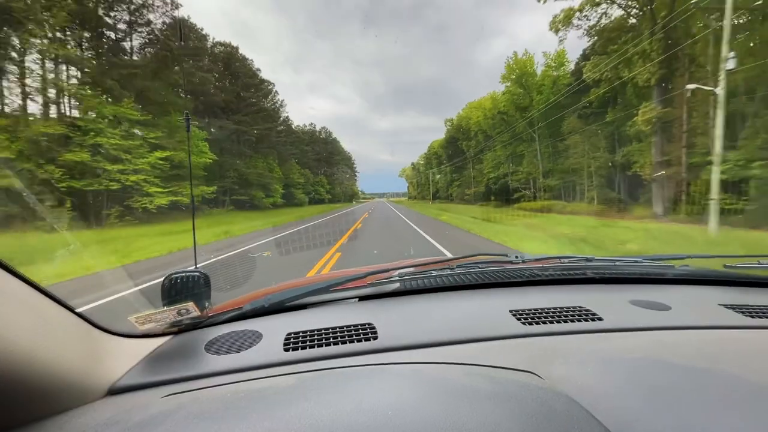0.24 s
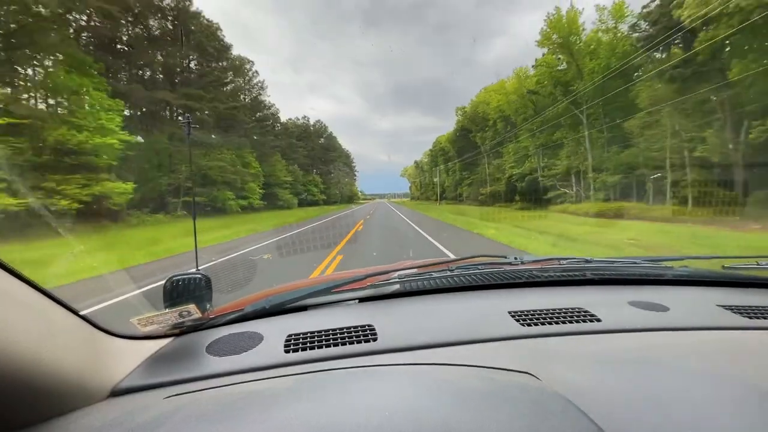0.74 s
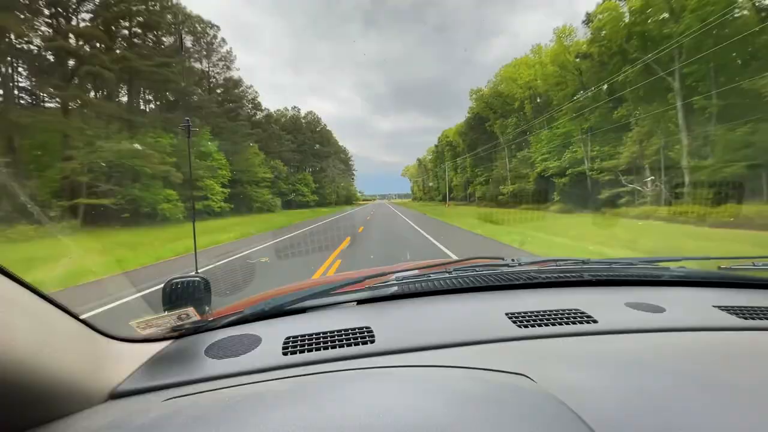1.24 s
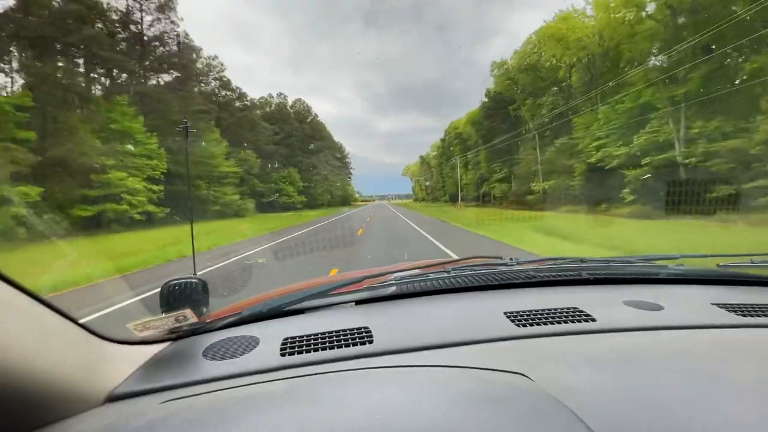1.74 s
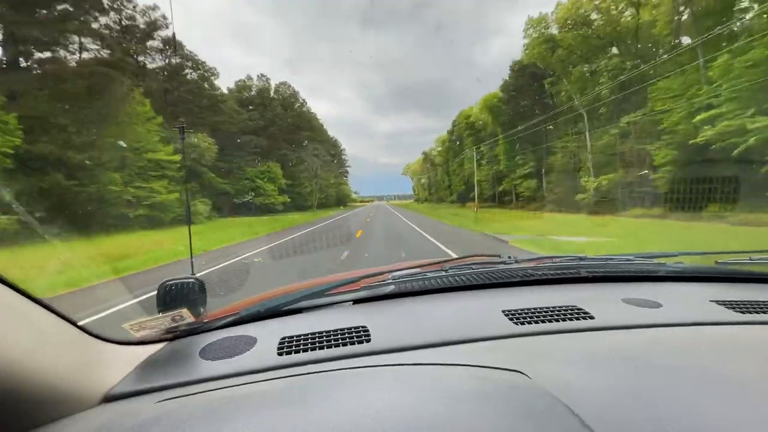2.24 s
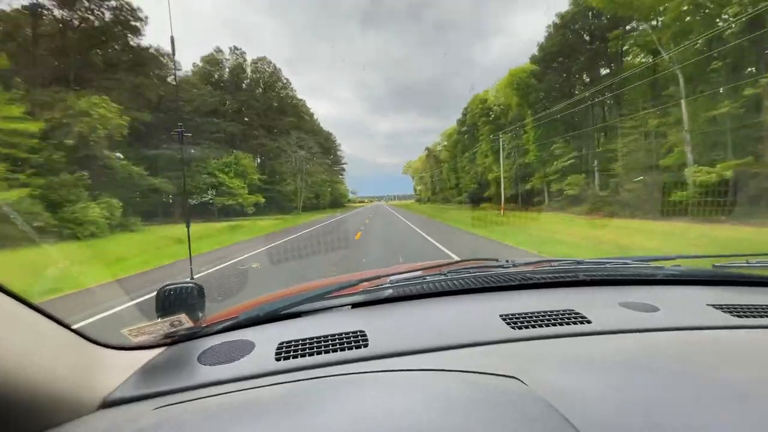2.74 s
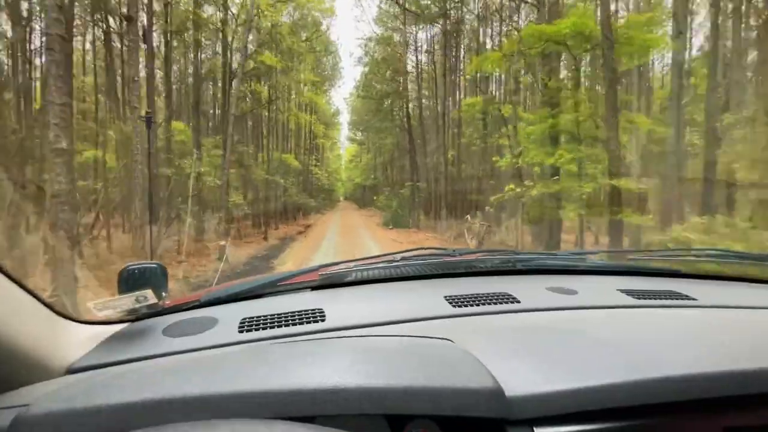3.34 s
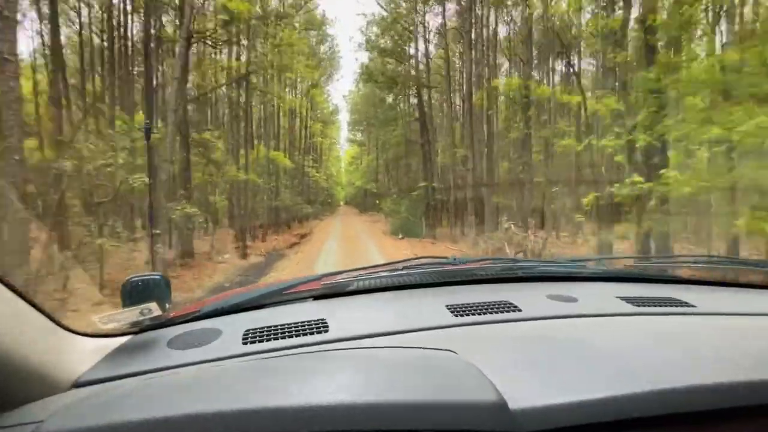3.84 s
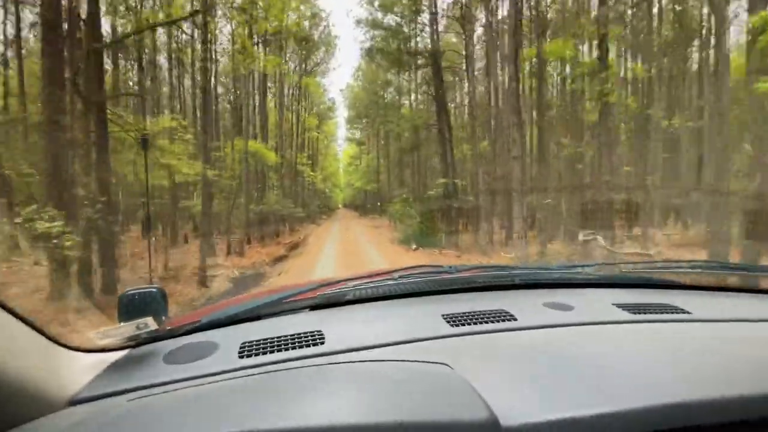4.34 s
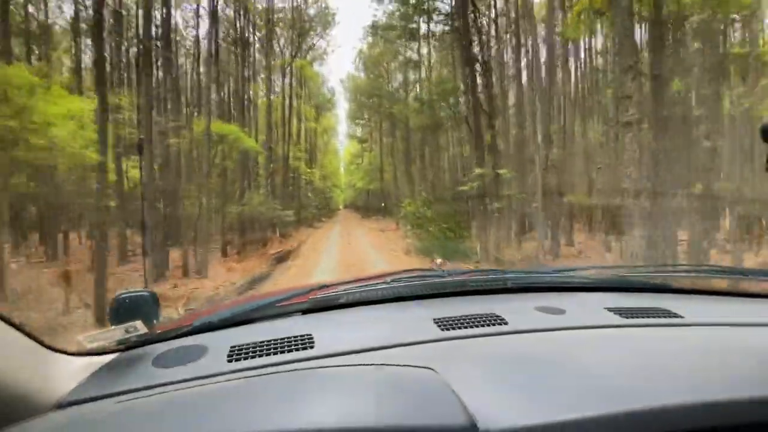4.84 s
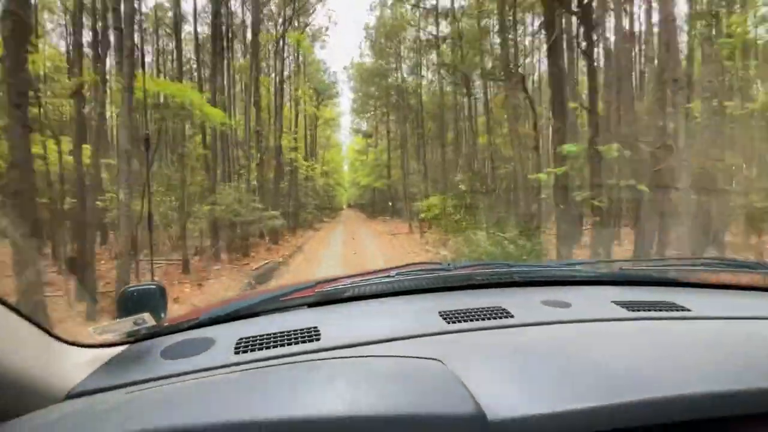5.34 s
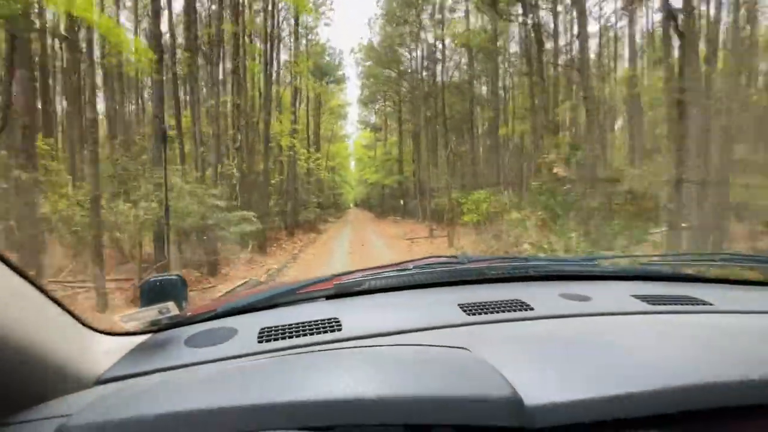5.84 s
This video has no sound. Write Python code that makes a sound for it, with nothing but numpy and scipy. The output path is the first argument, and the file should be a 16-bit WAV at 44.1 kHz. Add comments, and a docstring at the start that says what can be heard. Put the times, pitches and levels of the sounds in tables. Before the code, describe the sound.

Inside a closed truck cab, fast asphalt roar and wind hiss blend into slow, low rumbling over dirt, with knocks and ticking trim.

```python
"""Tyres roar and sing on asphalt, wind hisses and the engine surges, inside the shut cab of a pickup at speed.
This cross-fades into a slow drive along a dirt track: a low boom swells, grit crunches, trim ticks and rattles.
Shaped noise makes road and wind, sines make the engine and boom swells, bursts of grains and damped modes the rattles.
The two ports of a hand-held microphone hear most sounds a little apart; the engine sits in the centre."""
import sys
import numpy as np
from scipy import signal
from scipy.fft import rfft, irfft
from scipy.io import wavfile
from scipy.ndimage import uniform_filter1d

SR = 44100
rng = np.random.default_rng(int(sys.argv[2]) if len(sys.argv) > 2 else 0)


def store_pcm(level_fs):
    """Save levels as 16-bit WAV."""
    pcm = np.round(np.clip(level_fs, -1, 1) * 32767).astype(np.int16)
    wavfile.write(sys.argv[1], SR, np.atleast_2d(pcm).T)


N = 268128
TIME = np.arange(N) / SR
FREQ = np.maximum(np.arange(N // 2 + 1) * SR / N, 1)
TOP_HZ = 13500  # upper edge of the sound


def undb(db):
    """Decibels to gain."""
    return 10 ** (np.asarray(db) / 20)


def unit(x):
    """Scale to rms 1."""
    return x / np.sqrt(np.mean(x ** 2))


def curves(table):
    """The columns of a table as curves in time."""
    s, *columns = np.transpose(table)
    return [np.interp(TIME, s, column) for column in columns]


def over_freq(table):
    """The columns of a table on a log-frequency axis."""
    hz, *columns = np.transpose(table)
    return [np.interp(np.log(FREQ), np.log(hz), column) for column in columns]


def tone(table):
    """Gain of a spectrum that falls away above its last point."""
    return undb(over_freq(table)[0]) / np.maximum(FREQ / table[-1][0], 1) ** 3


def shape(x, gain):
    """Filter by a frequency response."""
    return irfft(rfft(x) * gain, N)


def band_rms(x, lo_hz, hi_hz):
    """Rms of the centre image between two frequencies."""
    return np.std(shape(x.mean(axis=0), (FREQ > lo_hz) & (FREQ < hi_hz)))


def resonance(hz, width_hz):
    """Response of one damped mode."""
    return 1 / (1 + 1j * (FREQ ** 2 - hz ** 2) / (FREQ * width_hz))


def walk(rate_hz):
    """Smooth random drift of rms 1, with little movement faster than rate_hz."""
    return unit(shape(rng.standard_normal(N), 1 / (1 + (FREQ / rate_hz) ** 4)))


def noise():
    """Two unrelated noises."""
    return rng.standard_normal((2, N))


def ports(pair, pan_db, coherence, lead_rad):
    """Mix two unrelated signals into left and right with a given likeness and phase lead."""
    likeness = np.clip(coherence, 0, .995)
    mid = rfft(pair[0]) * np.sqrt(1 + likeness)
    side = rfft(pair[1]) * np.sqrt(1 - likeness)
    turn = undb(pan_db / 2) * np.exp(.5j * lead_rad)
    return irfft(np.array([(mid + side) * turn, (mid - side) / turn]), N)


def even(x, span_s):
    """Hold a noise's slow loudness steady by dividing out its smoothed level."""
    size = max(int(span_s * SR), 2)
    power = uniform_filter1d(uniform_filter1d(np.mean(x ** 2, axis=0), size), size)
    return x * np.sqrt(power.mean() / power)


def grains(rate_hz, spread_db):
    """Two streams of tiny impacts at random times, their sizes spread exponentially in dB."""
    size_db = spread_db * np.minimum(rng.exponential(size=(2, N)), 5)
    hits = rng.random((2, N)) < rate_hz / SR
    return unit(hits * noise() * undb(size_db))


def singing(modes):
    """Narrow resonances kept ringing by noise, each held at a steady loudness."""
    total = 0
    for hz, width_hz, db, pan_db, lead_rad in modes:
        # the mode filters twice, so the peak is narrower than width_hz
        hum = shape(ports(noise(), pan_db, 0.75, lead_rad), resonance(hz, width_hz) ** 2)
        total = total + undb(db) * even(unit(hum), 0.35)
    return total


# Echoes off windscreen, roof and doors: delay_s, gain (relative to the direct hiss)
PANEL_ECHOES = [(.00135, 0.068), (.0023, -.17), (.0041, .16), (.0067, .15), (0.0118, -.14)]


def reflections():
    """Fine comb that the nearby panels put on the hiss, scaled to rms gain 1."""
    comb = 1 + sum(gain * np.exp(-2j * np.pi * FREQ * delay_s) for delay_s, gain in PANEL_ECHOES)
    return comb / np.sqrt(np.mean(np.abs(comb) ** 2))


# Colour of the wind: pitch_hz, level_db (relative, per Hz)
WIND_COLOUR = [(1500, -25), (3000, 4), (3750, -0.5), (4450, 1.5), (5250, -.5), (6400, 1), (7100, 1),
               (8200, 0), (9250, -.5), (10000, -12), (11000, -12), (11600, -21), (13400, -24)]
# Cab sound field at speed: pitch_hz, left_minus_right_db, coherence (0-1), left_lead_rad
ASPHALT_FIELD = [(50, 1.5, 0.97, .1), (171, -2, 0.94, 0.51), (300, 3.5, 0.35, 0.41), (470, -1, 0.73, 1.3),
                 (720, 7, 0.75, 1.7), (940, 1, 0.23, 1.8), (1100, 3.5, 0.46, 1.2), (1870, -5, 0.73, 2.86),
                 (2710, -3.5, 0, 3.57), (3520, -3.5, 0.17, 7.4), (4360, -1, 0.73, 7.05),
                 (5230, -1.5, 0.1, 7.2), (6200, 6, 0.5, 7.3), (8400, 0, 0.61, 9.65),
                 (10200, -2.5, 0.6, 6.5)]
GUST_DB = 1  # rms flutter of the wind


def wind(level_db):
    """Hiss of air on the pillars: coloured noise with a quick flutter, combed by the cab panels."""
    hiss = shape(ports(noise(), *over_freq(ASPHALT_FIELD)), tone(WIND_COLOUR) * reflections())
    hiss = hiss / band_rms(hiss, 3000, 10000)
    return hiss * undb(level_db + GUST_DB * walk(30))


def engine(course, orders, wobble, flutter_db):
    """Firing orders through the bulkhead: sines on one wavering pitch, each fluttering in level."""
    firing_hz, level_db = curves(course)
    phase = 2 * np.pi * np.cumsum(firing_hz * (1 + wobble * walk(6.5))) / SR
    total = 0
    for multiple, order_db in orders:
        level = undb(level_db + order_db + flutter_db * walk(12))
        total = total + level * np.sin(multiple * phase + 2 * np.pi * rng.random())
    return total


# Engine at speed: time_s, firing_hz (before wobble), level_db (before order and flutter)
CRUISE_COURSE = [(0, 114.6, -25), (.18, 116.6, -28), (.27, 116.6, -15), (.36, 116.5, -29),
                 (.54, 117.1, -17.5), (.71, 115.9, -24), (.78, 115.9, -20.5), (1.05, 117, -17),
                 (1.12, 116.5, -31), (1.21, 116.8, -14.5), (1.4, 117.2, -26.5), (1.45, 117.5, -16.5),
                 (1.84, 117.4, -23), (1.98, 117.9, -18), (2.05, 117.5, -28), (2.3, 117.9, -17),
                 (2.55, 117.9, -23.5), (3.3, 120, -14)]
# Engine partials at speed: multiple (of the firing rate), level_db (added to the course)
CRUISE_PARTIALS = [(.5, -10), (1, 3), (1.5, -23.5), (2.002, -32), (3.8, -25)]


def cruise_engine():
    """Surging drone of an engine at speed, its firing rate barely wobbling."""
    return engine(CRUISE_COURSE, CRUISE_PARTIALS, wobble=0.0026, flutter_db=0.5)


# Engine on the track: time_s, firing_hz (before wobble), level_db (before order and flutter)
CRAWL_COURSE = [(2.6, 97.26, -29), (3.64, 95.7, -32), (3.8, 92.64, -47), (3.92, 92.74, -33.5),
                (4.42, 97.9, -30.5), (4.86, 101.9, -30.5), (5.02, 98.8, -44), (5.6, 88.3, -41),
                (6.08, 88, -41)]
# Engine partials on the track: multiple (of the firing rate), level_db (added to the course)
CRAWL_PARTIALS = [(.5, -5), (1, 4), (1.5, -11), (2, -14)]


def crawl_engine():
    """Low, uneven drone of an engine at a crawl, with more random wobble and flutter."""
    return engine(CRAWL_COURSE, CRAWL_PARTIALS, wobble=0.0097, flutter_db=3.0)


# Whine modes: pitch_hz, width_hz (of one pass), level_db (before the load), left_minus_right_db, left_lead_rad
WHINE_MODES = [(405.3, 13.7, -5.5, -4, 0.008), (452, 7.8, -9, 3.5, 0.0034)]
# Whine as the throttle moves: time_s, level_db
WHINE_LEVEL = [(3, -56), (3.7, -42.5), (4.3, -47.5), (4.95, -38.5), (5.3, -49), (6.08, -59)]


def drivetrain_whine():
    """Faint drivetrain whine: two ringing modes that rise and fall with the load."""
    return singing(WHINE_MODES) * undb(curves(WHINE_LEVEL)[0])


def jolt(colour, contact_rate_hz, rise_s, start_s, level_db, pan_db, decay_s, tilt_db):
    """A burst of tiny contacts that sounds through a loose part."""
    age = TIME - start_s
    burst = np.clip(age / rise_s, 0, 1) * np.exp(-np.maximum(age - rise_s, 0) / decay_s)
    hits = grains(contact_rate_hz, spread_db=-0.2) * burst
    contacts = ports(hits, 0, 0.63, 2 * np.pi * FREQ * 0.000286)  # left leads by 0.286 ms
    octaves = np.log2(np.clip(FREQ, 800, TOP_HZ) / 800)
    sound = shape(contacts, colour * undb(tilt_db * octaves))
    side_db = np.array([[pan_db], [-pan_db]]) / 2
    return unit(sound) * np.sqrt(np.mean(burst ** 2)) * undb(level_db + side_db)


def ring(modes, start_s, level_db, pan_db):
    """Modes struck at one moment ring out, each reaching the two ports a little apart."""
    out, sides = np.zeros((2, N)), np.array([[1], [-1]])
    near = (TIME > start_s) & (TIME < start_s + .15)
    age = TIME[near] - start_s
    lags_rad = rng.uniform(-0.84, 1, len(modes))
    for (hz, width_hz, mode_db), lag in zip(modes, lags_rad):
        decay = np.exp(-np.pi * width_hz * age)
        out[:, near] += undb(mode_db) * decay * np.sin(2 * np.pi * hz * age + lag * sides)
    return out * undb(level_db + sides * pan_db / 2)


# Ring of the trim panel: pitch_hz, width_hz, level_db (before the focus of the blow)
PANEL_MODES = [(1860, 70, 1), (2600, 80, -2), (2930, 100, -6), (3590, 54, -2.5), (4300, 65, -12),
               (5430, 67, -1.5), (7020, 70, -2.5), (9250, 110, -2)]
TRIM_FOCUS_DB = 11  # modes ring this much less for each octave from the favoured pitch


def panel(favoured_hz):
    """The modes of the trim, weighted by the place of the blow."""
    return [(hz, width_hz, db - TRIM_FOCUS_DB * abs(np.log2(hz / favoured_hz)))
            for hz, width_hz, db in PANEL_MODES]


# Plastic snaps: start_s, level_db, left_minus_right_db, decay_s, tilt_db (per octave), ring_db, favoured_hz
TRIM_SNAPS = [(1.952, -46, -1, .0046, -8, -47, 1800), (3.566, -51, 8, 0.0048, -2, -56, 5340),
              (4.088, -33, -1, .0026, -2.3, -40.5, 3600), (4.8075, -25, -2, 0.0016, -1.9, -36.5, 2700),
              (5.552, -33.5, -3, .0036, -1.6, -40.5, 3600)]
# Bare snap of the plastic: pitch_hz, level_db (relative, per Hz)
PLASTIC_COLOUR = [(200, -10), (900, 4), (1500, -4.5), (1850, -0.5), (2200, -8), (2700, -9), (3500, -10),
                  (4500, -13.5), (5600, -11.5), (6500, -13.5), (7700, -19.5), (9200, -13), (10500, -20.5),
                  (13400, -22)]
TRIM_RISE_S = 0.002


def trim_snaps():
    """Loose plastic snaps as a short burst of contacts, then its panel rings."""
    plastic, total = tone(PLASTIC_COLOUR), 0
    for start_s, db, pan_db, decay_s, tilt_db, ring_db, favoured_hz in TRIM_SNAPS:
        snap = jolt(plastic, 24000, TRIM_RISE_S, start_s, db, pan_db, decay_s, tilt_db)
        total = total + snap + ring(panel(favoured_hz), start_s + TRIM_RISE_S, ring_db, pan_db)
    return total


# Bumps and stones: start_s, level_db, left_minus_right_db, decay_s, tilt_db (per octave), rise_s
FLOOR_KNOCKS = [(.781, -19, 1, 0.0055, 6, 0.00197), (3.353, -37, 1, .0042, 5.5, .001),
                (3.522, -39, 0, .0046, -11, .0013), (3.672, -38, 3, .013, 1, .005),
                (4.344, -37, 3, .034, 1.5, .014), (4.535, -42, 1, .02, 1, .01),
                (4.64, -38, 5, 0.0072, -6, .003), (4.708, -38.5, 0, .012, -5, .003),
                (4.795, -36, -2, .0045, -2, 0.0015), (4.895, -43, -3, .016, -2, .004),
                (5.452, -42, 1, 0.025, 6, .008), (5.64, -33.5, 6, .004, 2, 0.0011),
                (5.652, -34.5, -3, .005, 1, 0.00095)]
# Colour of the knocks: pitch_hz, level_db (relative, per Hz)
KNOCK_COLOUR = [(100, -20), (400, 3.5), (750, 3.5), (1100, -2.5), (1600, -13), (2500, -29.5)]
# Ring of the floor pan: pitch_hz, width_hz, level_db (against the knock, before hardness)
FLOOR_MODES = [(700, 70, 0.5), (1080, 110, -4)]
HARD_CONTACT_S = .002  # slower contacts hardly ring the floor pan


def floor_knocks():
    """Bumps and stones knock through the suspension; quick contacts ring the floor pan."""
    floor_pan, total = tone(KNOCK_COLOUR), 0
    for start_s, db, pan_db, decay_s, tilt_db, rise_s in FLOOR_KNOCKS:
        hardness = 1 / (1 + (rise_s / HARD_CONTACT_S) ** 2)
        knock = jolt(floor_pan, 6000, rise_s, start_s, db, pan_db, decay_s, tilt_db)
        total = total + knock + hardness * ring(FLOOR_MODES, start_s + rise_s, db, pan_db)
    return total


# Small metal parts: start_s, level_db, left_minus_right_db, decay_s, tilt_db (per octave),
# ring_db (against the bare metal), ring_hz
METAL_CHATTER = [(3.356, -64, 1, .018, 5, 14, 11500), (4.326, -67, 0, .004, 7, 13, 11600),
                 (4.816, -48, -5, .017, -9, -20, 7700), (5.513, -63.5, 0, .04, 3, 3, 9500),
                 (5.639, -53, 2, .009, 1, -6, 9800), (5.649, -50.5, 3, 0.023, -1, 2, 7780)]
# Colour of the metal: pitch_hz, level_db (relative, per Hz)
METAL_COLOUR = [(1500, -17), (3800, -5), (4700, -1.5), (5300, -4), (6100, 0), (6800, -8), (7600, 1.5),
                (8400, -8), (9700, -2), (10600, -14), (13000, -18)]
CHATTER_RISE_S, CHATTER_RING_WIDTH_HZ = .005, 280


def metal_chatter():
    """Small metal parts chatter: bursts of contacts through one bright resonance each."""
    metal, total = tone(METAL_COLOUR), 0
    for *blow, ring_db, ring_hz in METAL_CHATTER:
        ringing = 1 + undb(ring_db) * resonance(ring_hz, CHATTER_RING_WIDTH_HZ)
        total = total + jolt(metal * ringing, 4000, CHATTER_RISE_S, *blow)
    return total


CAB_T60_S, CAB_DB = 0.098, -9.5  # decay time; tail level against the direct sound


def rattles():
    """Trim, knocks and chatter, with the short noise tail of the upholstered cab."""
    direct = trim_snaps() + floor_knocks() + metal_chatter()
    tail = noise() * np.exp(-np.log(1000) * TIME / CAB_T60_S)
    return direct + undb(CAB_DB) * shape(direct, rfft(unit(tail)) / np.sqrt(N))


def body_and_roar(colour, field, split_hz):
    """Road shake, parted into the boom of the cab panels and the roar of the tyres."""
    shake = shape(ports(noise(), *over_freq(field)), tone(colour))
    boom = shape(shake, 1 / (1 + (FREQ / split_hz) ** 8))
    return boom, shake - boom


# Asphalt: time_s, rumble_db, wind_db, roar_db
ASPHALT_LEVELS = [(0, -19, -48, -25), (.85, -20.5, -48, -26), (1.5, -22, -49.5, -25.5),
                  (2.05, -24, -50, -26.5), (2.3, -25, -47.5, -25.5), (3, -19.5, -50, -26)]
# Road noise let in at speed: pitch_hz, level_db (relative, per Hz)
ASPHALT_COLOUR = [(20, -27), (35, -8.5), (48, 1), (70, 1.5), (95, -2.5), (175, -1), (250, -12), (400, -12),
                  (560, -21), (950, -24.5), (1300, -27.5), (1700, -30.5), (2400, -34.5), (4000, -50.5),
                  (6000, -69)]
# Tyre air cavity and tread: pitch_hz, width_hz (of one pass), level_db (before TREAD_DB),
# left_minus_right_db, left_lead_rad
TREAD_MODES = [(414.5, 22, -10.5, 1.5, 1.35), (447, 6.4, -20.5, -6, 0.92), (485.1, 15.2, -6, 11.5, 1.45),
               (499.5, 6.1, -15.5, 9, 1.5), (643.6, 93, -12.5, -3.5, 0.26), (733.4, 39.5, -10, 0.5, 1.33),
               (847, 36, -18, -5.5, 1.28), (1003, 31, -23.5, 1, 1.5), (1157, 45, -19, 3.5, 1.9)]
# Rolling drone that beats against the engine: pitch_hz, width_hz (of one pass), level_db,
# left_minus_right_db, left_lead_rad
TYRE_DRONE_MODES = [(68.75, 3.5, -28.5, 1, .2), (109.65, 3, -33, -2, .3), (209.5, 4.6, -35.5, 5, .5)]
TREAD_DB = -22.5
WHEEL_HZ, SWING_DB = 9.45, 0.06  # wheel turns; inaudibly small swing at once and twice a turn
PATCH_DB = 0.99  # rms random flicker of the roar over coarser and finer asphalt


def highway():
    """Asphalt at speed: rumble, tyre roar flickering at random, tread song nearly steady, wind, engine."""
    rumble_db, wind_db, roar_db = curves(ASPHALT_LEVELS)
    boom, roar = body_and_roar(ASPHALT_COLOUR, ASPHALT_FIELD, split_hz=93.0)
    boom = even(boom, .06) / band_rms(boom, 30, 100)
    roar = even(roar, .12) / band_rms(roar, 250, 1500)
    turn = 2 * np.pi * WHEEL_HZ * TIME
    swing = undb(SWING_DB * (np.sin(turn) + np.sin(2 * turn)))
    rolling = undb(roar_db + PATCH_DB * walk(22)) * roar
    tyres = (rolling + undb(TREAD_DB) * singing(TREAD_MODES)) * swing
    rumble = boom * undb(rumble_db) + singing(TYRE_DRONE_MODES)
    return rumble + tyres + wind(wind_db) + cruise_engine()


# Colour of the grit: pitch_hz, level_db (relative, per Hz)
GRIT_COLOUR = [(700, 11), (1300, 1), (1700, 5), (2400, -0.5), (2900, -4.5), (3450, -10), (4500, -13.5),
               (6500, -14.5), (9000, -23), (11000, -28), (13400, -37)]
# Cab sound field on the track: pitch_hz, left_minus_right_db, coherence (0-1), left_lead_rad
DIRT_FIELD = [(50, -2, 0.96, 0), (170, 0, 1, 0.5), (280, 0, 0.67, 0.26), (420, 2, 0.15, 1),
              (650, 0.5, 0.26, 1), (1000, 3, 0.32, 1.5), (1370, -1, 0.97, 2), (2120, -2.5, 0.2, 4.5),
              (3120, -2, 0.37, 7.5), (4440, -2, 0.46, -1.2), (6360, 4.5, 0.22, 3), (8000, 4.5, 0.3, 2.5),
              (10500, -2.5, 0.53, 0.5)]
GRIT_DB = -59  # on usual ground


def grit(ground_db):
    """Grit crunches under the tyres: noise and sparse grains, louder on rougher ground."""
    sand = noise() + .4 * grains(rate_hz=900, spread_db=2.2)
    crunch = shape(ports(sand, *over_freq(DIRT_FIELD)), tone(GRIT_COLOUR) * reflections())
    crunch = crunch / band_rms(crunch, 1500, 3200)
    return crunch * undb(GRIT_DB + ground_db + 0.96 * walk(15))


# Dirt: time_s, roughness_db (above the usual)
GROUND_ROUGHNESS = [(3.3, 0.1), (3.9, -1), (4.3, 0.78), (4.6, 1), (4.82, 2.05), (5.05, 0.6), (5.8, 0.1),
                    (6.08, -0.3)]
# Road noise let in on the track: pitch_hz, level_db (relative, per Hz)
DIRT_COLOUR = [(20, -28), (33, -10), (47, -1), (62, 1), (85, -9), (150, -16.5), (190, -20.5), (220, -26),
               (300, -24), (370, -31), (430, -30.5), (550, -34.5), (900, -40), (1150, -41), (1400, -52.5),
               (2500, -63)]
# Air modes shaken by the track: pitch_hz, width_hz (of one pass), level_db, left_minus_right_db, left_lead_rad
CAB_AIR_MODES = [(128.1, 17.4, -39.5, -4, 0.007), (174.5, 19, -39, 0.5, 0.0067)]
TRACK_BOOM_DB, TRACK_ROAR_DB, CLODS_DB = -29.5, -42.5, -18.5  # on usual ground; clods against the roar
ROAR_PER_GROUND, BOOM_PER_GROUND = 0.73, 0.64  # dB for each dB of roughness


def track():
    """Dirt at low speed: the body rumbles; on rougher ground clods thud and grit crunches louder."""
    ground_db, = curves(GROUND_ROUGHNESS)
    boom, roar = body_and_roar(DIRT_COLOUR, DIRT_FIELD, split_hz=65.4)
    boom = even(boom, .055) / band_rms(boom, 30, 85)
    roar = even(roar, .1) / band_rms(roar, 220, 1300)
    clods = unit(shape(grains(rate_hz=150, spread_db=2.5), resonance(950, 720) ** 2))
    tyres = (roar + undb(CLODS_DB) * clods) * undb(TRACK_ROAR_DB + ROAR_PER_GROUND * ground_db)
    rumble = boom * undb(TRACK_BOOM_DB + BOOM_PER_GROUND * ground_db)
    road = rumble + tyres + grit(ground_db) + singing(CAB_AIR_MODES)
    return road + crawl_engine() + drivetrain_whine()


# Swells of the low boom: peak_s, level_db (before the ports), half_length_s (to 1/e), pitch_hz
BOOM_SWELLS = [(0.149, -19, 0.063, 71.6), (0.401, -23, .04, 57), (.575, -20, 0.025, 72.5),
               (0.74, -16.5, 0.026, 64.6), (.94, -16.5, 0.034, 63), (1.371, -19.5, 0.025, 61),
               (1.994, -15.5, 0.054, 59.2), (2.48, -19, 0.03, 65.6), (3.083, -22.5, .04, 54.01),
               (3.318, -22.5, .025, 62), (3.419, -19, .045, 55.26), (3.549, -23, 0.024, 49),
               (3.623, -18.5, 0.018, 56.01), (3.734, -19, 0.025, 54), (3.859, -28, 0.048, 129),
               (4.041, -20.5, 0.046, 52.4), (4.165, -18.5, 0.029, 51.2), (4.282, -20.5, .045, 50.3),
               (4.379, -22, .045, 50.3), (4.511, -24.5, 0.028, 58), (4.614, -20.5, 0.046, 53.3),
               (4.871, -20.5, .05, 62), (5.005, -20.5, .035, 54.6), (5.102, -31, .035, 140),
               (5.133, -17.5, 0.028, 52), (5.227, -20, 0.038, 56.7), (5.343, -23, .025, 61.3),
               (5.451, -18.5, 0.024, 54.3), (5.521, -20.5, .035, 51.3), (5.761, -21, 0.029, 51.3),
               (5.972, -21, 0.028, 53.7), (6.02, -31.5, 0.038, 172), (6.042, -18, 0.036, 57.5)]


def boom_swells():
    """Swells of the low boom: each rises to a low note and dies down again."""
    boom = np.zeros((2, N))  # the second, unrelated signal stays silent
    for (peak_s, db, half_s, hz), turn in zip(BOOM_SWELLS, rng.random(len(BOOM_SWELLS))):
        near = np.abs(TIME - peak_s) < 3 * half_s
        age = TIME[near] - peak_s
        swell = np.exp(-(age / half_s) ** 2)
        boom[0, near] += undb(db) * swell * np.sin(2 * np.pi * (hz * age + turn))
    return boom


FADE_START_S, FADE_END_S = 2.49, 3.374


def scene():
    """The asphalt fades out as the dirt track fades in; rattles lie over both."""
    blend = np.clip((TIME - FADE_START_S) / (FADE_END_S - FADE_START_S), 0, 1)
    boom = boom_swells()
    asphalt = highway() + ports(boom, *over_freq(ASPHALT_FIELD))
    dirt = track() + ports(boom, *over_freq(DIRT_FIELD))
    return (1 - blend) * asphalt + blend * dirt + rattles()


def record(dry):
    """The recorder cuts the top with a steep elliptic low-pass."""
    return signal.sosfilt(signal.ellip(8, .2, 70, TOP_HZ, fs=SR, output="sos"), dry)


dry = scene()
out = record(dry)
store_pcm(out)
```